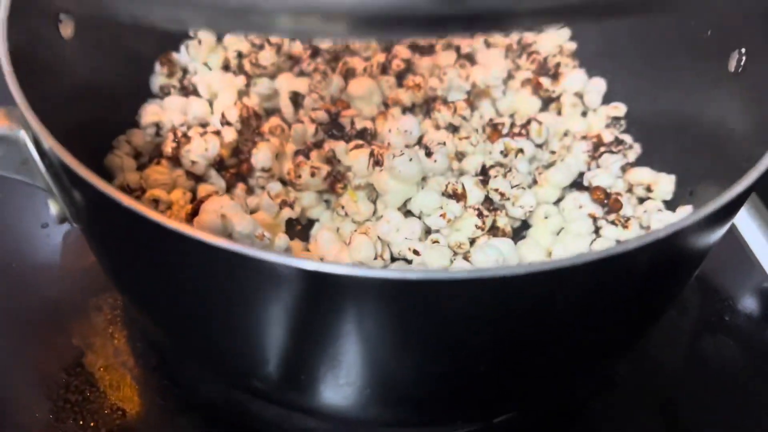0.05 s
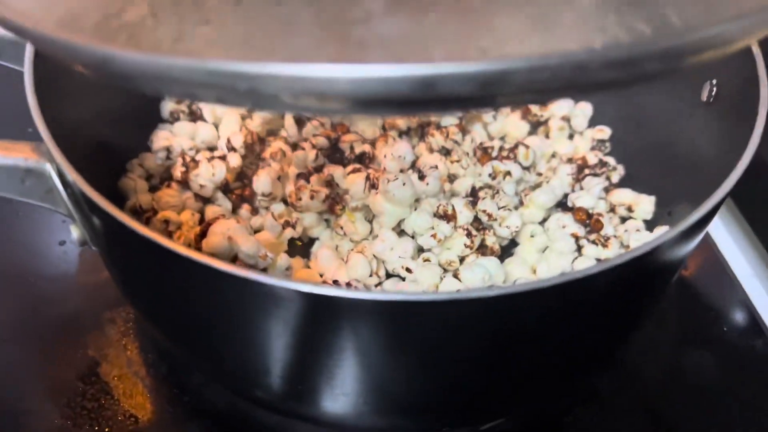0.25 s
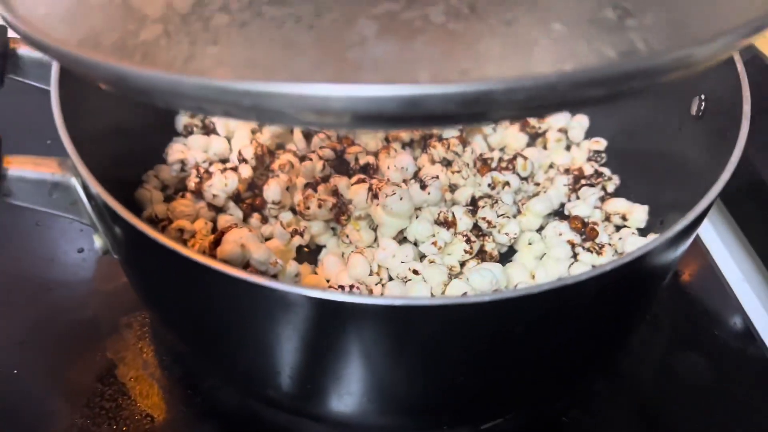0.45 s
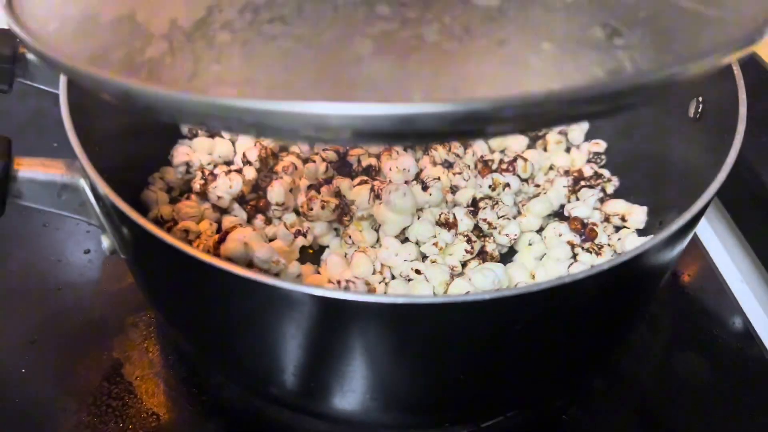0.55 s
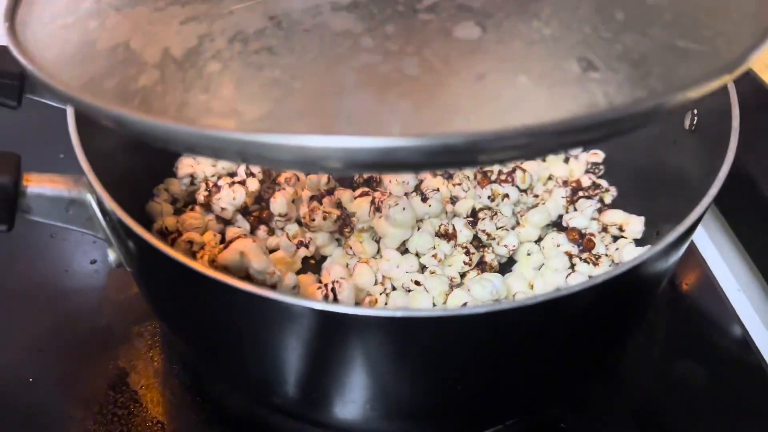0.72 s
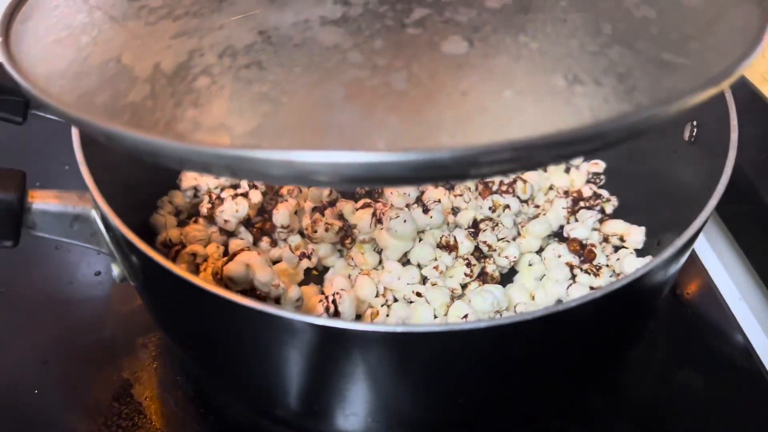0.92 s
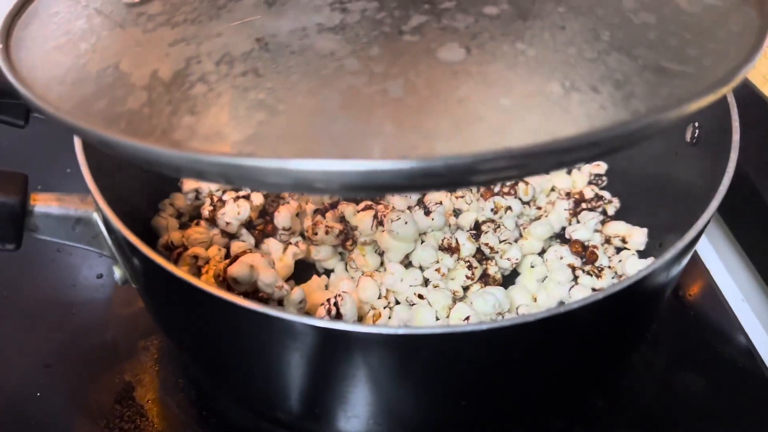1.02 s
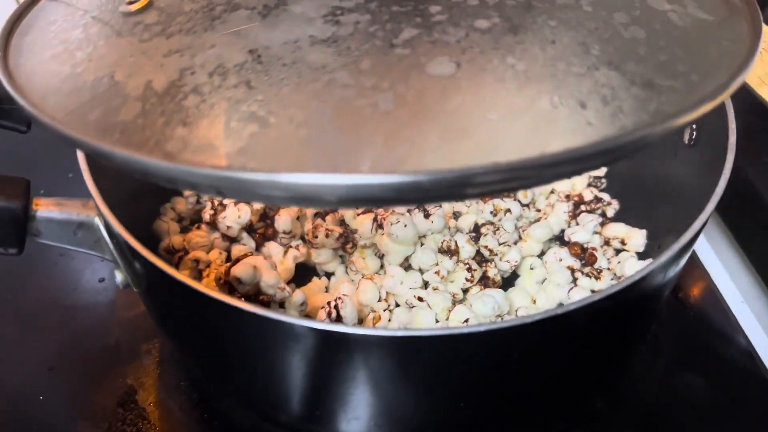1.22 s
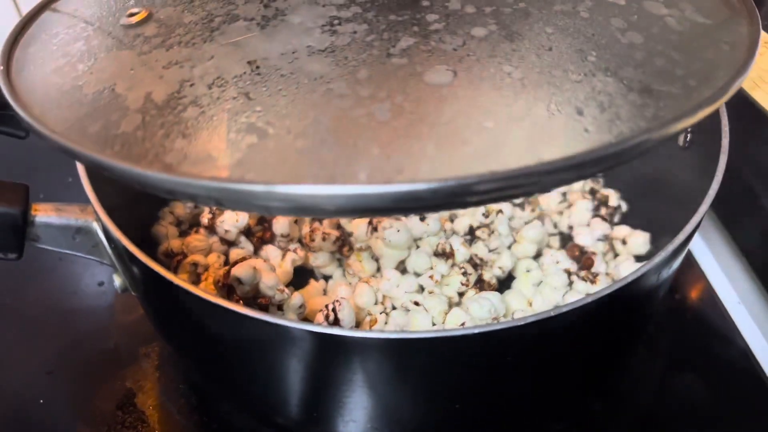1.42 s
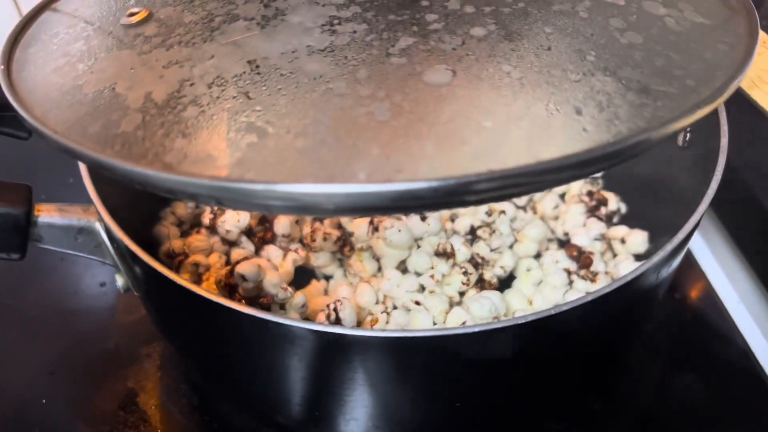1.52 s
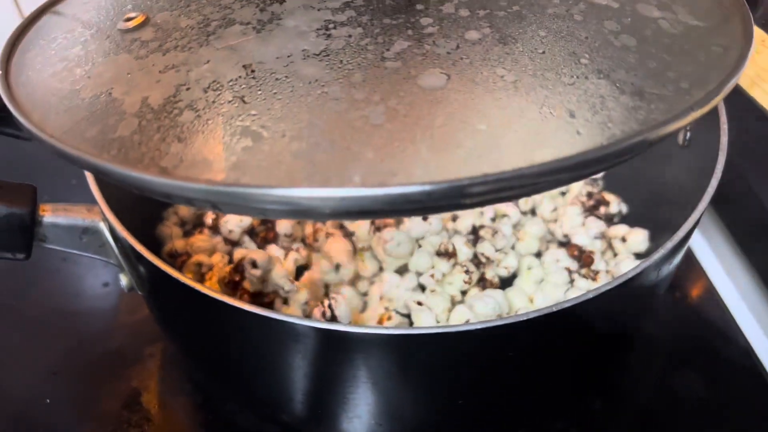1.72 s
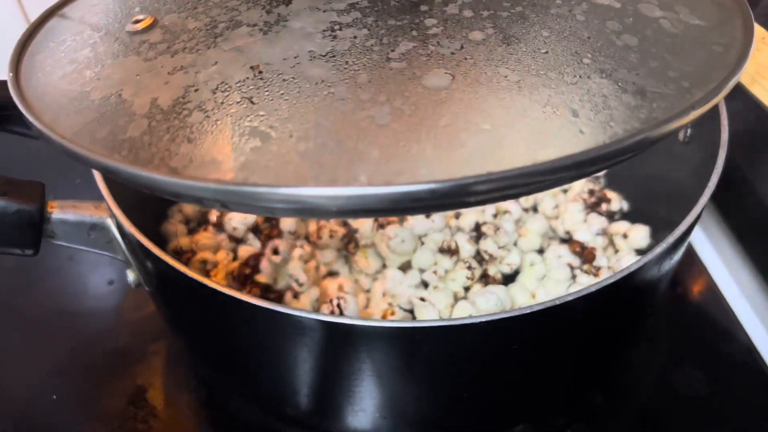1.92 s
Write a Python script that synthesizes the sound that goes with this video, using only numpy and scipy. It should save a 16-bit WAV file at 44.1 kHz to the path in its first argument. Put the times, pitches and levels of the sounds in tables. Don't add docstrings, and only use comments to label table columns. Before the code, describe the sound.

Popping corn kernels snap and knock against a steel pot and lid, with soft oil sizzle beneath.

```python
import sys
import numpy as np
from scipy import signal
from scipy.fft import rfft, irfft, next_fast_len
from scipy.io import wavfile
from scipy.ndimage import uniform_filter1d

SR = 44100
rng = np.random.default_rng(int(sys.argv[2]) if len(sys.argv) > 2 else 0)


def pcm_store(signal):
    levels = np.round(np.clip(np.atleast_2d(signal), -1, 1) * 32767)
    wavfile.write(sys.argv[1], SR, levels.astype(np.int16).T)


def nominal_scale(level):
    x = np.asarray(level, float) / 20
    return 10 ** x


N = 85995


def unit(x):
    return x / np.sqrt(np.mean(x ** 2) + 1e-20)


def along(points, hz):
    f, v = np.transpose(points)
    return np.interp(np.log(hz + 1), np.log(f + 1), v)


def filtered(x, response):
    n = x.shape[-1]
    m = next_fast_len(n + 8192)
    return irfft(rfft(x, m) * response(np.fft.rfftfreq(m, 1 / SR)), m)[..., :n]


def add(track, s, sound):
    part = track[:, round(s * SR):][:, :sound.shape[1]]
    part += sound[:, :part.shape[1]]


def rush(spectrum, patchy_db):
    # (frequency [Hz], likeness [-1 to 1])
    alike = [(60, 0.92), (130, 0.97), (220, 0.64), (400, -0.42), (1650, -0.014), (15000, 0.053)]
    z = signal.stft(rng.standard_normal((2, N + 512)), nperseg=512)[2]
    field = uniform_filter1d(rng.standard_normal(z.shape[1:]), size=6, axis=0)
    field = uniform_filter1d(field, size=8, axis=1)
    pair = signal.istft(z * nominal_scale(patchy_db * unit(field)), nperseg=512)[1][:, :N]

    def spread(hz):
        turn = np.arccos(np.clip(along(alike, hz), -1, 1)) / 2
        return nominal_scale(along(spectrum, hz)) * [np.cos(turn), np.sin(turn)]

    mid, side = filtered(pair, spread)
    return np.array([mid + side, mid - side]) / np.sqrt(np.mean(mid ** 2))


def background():
    # (frequency [Hz], level [dB])
    hum_curve = [(15, -32), (25, -8), (54, -0.5), (206, -11), (224, -12), (452, -12.5), (565, -19),
                 (718, -14), (1500, -37), (1950, -62), (3300, -120)]
    # (frequency [Hz], level [dB])
    fizz_curve = [(600, -15.5), (1000, -0.5), (1500, -3), (2500, -6.5), (6200, -4), (8600, -7.5),
                  (9600, -9), (12000, -120)]
    # (frequency [Hz], level [dB])
    hiss_curve = [(8500, -36), (9400, -9), (9700, -26), (10800, -9), (11100, -4.5), (13100, -6),
                  (13400, -32), (14300, -25), (14600, -4.5), (15800, -6), (16200, -44)]
    spits_per_s, spit_db = 330, -22
    hum_db, fizz_db, hiss_db = -49, -52.5, -57.5
    draw = rng.random((3, N))
    spits = (draw[0] < spits_per_s / SR) * np.log(draw[1:] + 1e-9)
    spits = unit(filtered(spits, lambda hz: nominal_scale(along(fizz_curve, hz))))
    hum = nominal_scale(hum_db) * rush(hum_curve, patchy_db=2.5)
    fizz = nominal_scale(fizz_db) * (rush(fizz_curve, patchy_db=1.84) + nominal_scale(spit_db) * spits)
    hiss = nominal_scale(hiss_db) * rush(hiss_curve, patchy_db=0.0)
    return hum + fizz + hiss


def buzz():
    # (frequency [Hz], level [dB])
    overtones = [(452.2, -60), (651.4, -65), (699.8, -70), (748.3, -62.5), (802.1, -61), (850.6, -65),
                 (952.8, -64)]
    t = np.arange(N) / SR
    total = np.zeros((2, N))
    for hz, db in overtones:
        wander = np.cumsum(rng.standard_normal(N)) * np.sqrt(1.5 / (2 * np.pi * SR))
        cycles = hz * t + rng.random((2, 1)) + wander
        total += nominal_scale(db) * np.sin(2 * np.pi * cycles)
    return total


def kitchen(x):
    # (frequency [Hz], time to fall 60 dB [s])
    echo_times = [(200, 0.1), (1000, 0.58), (4000, 0.47), (8000, 0.44), (16000, 0.043)]
    gap_s = 0.005
    out, step = np.zeros((2, N)), SR // 10
    for start in range(0, N, step):
        hz, t, z = signal.stft(rng.standard_normal((2, SR // 2)), SR, nperseg=256)
        fade = nominal_scale(-60 * t / along(echo_times, hz)[:, None])
        tail = signal.istft(z * fade, SR, nperseg=256)[1]
        tail = tail / np.linalg.norm(tail[0])
        add(out, start / SR + gap_s, signal.fftconvolve(x[None, start:start + step], tail, axes=1))
    return out


def steam():
    # (end time [s], swell time [s], level [dB])
    leak = (.2245, 0.022, -29)
    end_s, swell_s, db = leak
    ahead = end_s - np.arange(N) / SR
    jet = rush([(2500, -14), (4000, 3), (6300, -6), (7500, -6), (9000, -55)], patchy_db=7.5)
    return nominal_scale(db - 25 * np.abs(ahead) / swell_s) * (ahead > 0) * jet


def ring(modes, t, attack_s, scatter_db, blur=2 * np.pi):
    wander_hz = 9.3
    draw = rng.standard_normal((len(modes), 2))
    steps = rng.standard_normal((len(modes), len(t)))
    drifts = np.cumsum(steps, axis=1) * np.sqrt(wander_hz * blur / SR)
    total = np.zeros(len(t))
    for (hz, db, t60), (louder, sharper), drift in zip(modes, draw, drifts):
        tone = np.sin(2 * np.pi * hz * (1 + 0.0089 * sharper) * t + drift)
        total += nominal_scale(db + scatter_db * louder - 60 * t / t60) * tone
    return total * (1 - np.exp(-t / attack_s))


def burst(t, spectrum, rattle_db):
    rise_s, snap_t60 = 0.00155, 0.002
    rattle_s, rattle_t60, spiky_db = 0.0023, 0.011, 4
    shared = 0.28
    noise = rng.standard_normal((4, len(t)))
    spikes = nominal_scale(spiky_db * unit(uniform_filter1d(noise[3], size=24)))
    spikes = spikes / np.sqrt(np.mean(spikes[:round(0.006 * SR)] ** 2))
    after = np.maximum(t - rise_s, 0)
    rattle = spikes * nominal_scale(rattle_db - 60 * np.maximum(after - rattle_s, 0) / rattle_t60)
    shape = np.minimum(t / rise_s, 1) ** 2 * (nominal_scale(-60 * after / snap_t60) + rattle)
    z = rfft(shape * (np.sqrt(shared) * noise[0] + np.sqrt(1 - shared) * noise[1:3]))
    even = z / np.sqrt(uniform_filter1d(np.abs(z) ** 2, size=100, axis=1) + 1e-12)
    colour = nominal_scale(along(spectrum, np.fft.rfftfreq(len(t), 1 / SR)))
    pair = irfft(even * colour, len(t)) * (t < t[-1] / 2)
    return unit(pair) * np.sqrt(np.mean(shape ** 2))


def thuds():
    # (time [s], hollow level [dB], wall level [dB], knock level [dB])
    blows = [(.224, -35, -33, -18), (0.236, -28.5, -26, -15), (.264, -32.5, -28, -21),
             (0.298, -38, -27, -40), (0.3086, -23, -20.5, -22), (0.3114, -28, -24, -16),
             (0.36, -36.5, -28.5, -41), (0.5064, -15.5, -40.5, -38), (0.518, -24.5, -56, -34.5),
             (0.5276, -19, -23.5, -13.5), (0.556, -29, -40, -45), (0.578, -38, -36, -33),
             (0.9196, -27.5, -41, -41), (.93, -55, -35.5, -29), (1.383, -22, -35, -23),
             (1.395, -40, -41, -22), (1.592, -22, -22, -10), (1.601, -27.5, -21.5, -18),
             (1.611, -53, -25, -18), (1.6686, -28, -34, -26), (1.671, -21.5, -27.5, -21.5)]
    # (time [s], pitch [Hz], level [dB])
    rocks = [
        (0.238, 98, -31),
        (0.343, 79.2, -41),
        (.53, 70.4, -25),
        (0.599, 92.4, -38.5),
        (1.386, 134, -34),
        (1.595, 120, -31.5),
    ]
    # (frequency [Hz], level [dB], time to fall 60 dB [s])
    hollow_modes = [(154.5, 0, 0.04), (258.8, 3, 0.043), (295.8, -5.5, 0.074), (427.3, 1, 0.048),
                    (465.4, 2, 0.09)]
    # (frequency [Hz], level [dB], time to fall 60 dB [s])
    wall_modes = [(1099.3, -9, 0.28), (1148.6, -1, 0.057), (1477, -6.5, 0.14), (1979, -6.5, 0.084)]
    # (frequency [Hz], level [dB], time to fall 60 dB [s])
    rim_modes = [(1364, -8.5, 0.018), (1540, 3, 0.034), (1684, -1, 0.017), (1950, -30, 0.0052)]
    # (frequency [Hz], level [dB])
    puff_curve = [(120, -27), (250, -28.5), (460, 0), (560, -19), (900, -25.5), (2000, -70)]
    # (frequency [Hz], level [dB])
    scrape_curve = [(600, -64), (900, -17), (1150, -16), (1600, 3), (2100, -1.5), (3200, -23)]
    hollow_db, rim_db, scrape_db = -3, -3.5, -3.5
    rock_t60, pan_db = 0.14, 2.5
    out, puffs, t = np.zeros((2, N)), np.zeros((2, N)), np.arange(SR // 4) / SR
    for s, db, wall_db, knock_db in blows:
        air = nominal_scale(db + hollow_db) * ring(hollow_modes, t, 0.0047, 1.1, blur=2)
        metal = []
        for port in "LR":
            wall = nominal_scale(wall_db) * ring(wall_modes, t, 0.0018, 0.38)
            rim = nominal_scale(knock_db + rim_db) * ring(rim_modes, t, 0.0021, 6.4)
            metal.append(wall + rim)
        add(out, s, air + np.array(metal))
        puff = nominal_scale(db) * burst(t, puff_curve, rattle_db=0)[[0, 0]]
        scrape = nominal_scale(knock_db + scrape_db) * burst(t, scrape_curve, rattle_db=0)
        add(puffs, s, puff + scrape)
    for s, hz, db in rocks:
        add(out, s, np.tile(ring([(hz, db, rock_t60)], t, 0.0033, 0, blur=0), (2, 1)))
    soft_puffs = filtered(puffs, lambda hz: 1 / (1 + 1j * hz / 2200) ** 2)
    return out * nominal_scale([[pan_db], [-pan_db]]), soft_puffs


def pings():
    # (time [s], pitch [Hz], level [dB], time to fall 60 dB [s])
    shards = [(.2218, 6900, -19, 0.016), (.2248, 3140, -6, 0.0069), (.2252, 6540, -5.5, 0.0071),
              (0.2263, 4300, -14, .007), (.2373, 3040, -6, 0.0075), (.2376, 4500, -26, 0.0045),
              (0.2392, 3000, -13, .008), (0.2622, 2700, -17, 0.007), (.2995, 3300, -22, 0.0072),
              (0.299, 6100, -10, 0.0063), (0.3103, 383, -23.5, 0.026), (0.3199, 6050, -21, 0.0088),
              (.5078, 614, -30, .012), (.5082, 2750, -24.5, 0.019), (0.52, 2780, -26, .012),
              (0.5273, 5660, -29, 0.0073), (.5285, 4400, -35, 0.0084), (.5335, 5940, -35, .012),
              (0.5824, 4300, -35, 0.0066), (1.3828, 3770, -17, 0.024), (1.3837, 1595, -16, .016),
              (1.3866, 3080, -16, .006), (1.3838, 6040, -18, 0.021), (1.3912, 1670, -20, .012),
              (1.3983, 6000, -27, 0.013), (1.5911, 3730, -3.5, 0.011), (1.593, 1640, -10.5, .012),
              (1.594, 806, -26, 0.014), (1.601, 3890, -7, 0.0069), (1.6033, 1750, -19, 0.0072),
              (1.6174, 1554, -23, 0.022), (1.672, 1690, -19.5, 0.012), (1.6852, 8000, -21, 0.011)]
    rise_s, split = 0.00045, 0.038
    out, t = np.zeros((2, N)), np.arange(SR // 20) / SR
    for s, hz, db, t60 in shards:
        pair = np.sin(2 * np.pi * hz * np.array([[1], [1 + split]]) * t)
        mixed = pair * nominal_scale(5) + 0.82 * pair[::-1]
        add(out, s, nominal_scale(db - 60 * t / t60) * (1 - np.exp(-t / rise_s)) ** 2 * mixed)
    return out


def cracks():
    # (time [s], body level [dB], brightness [dB])
    pops = [(0.2237, -2.5, -14.5), (0.2363, -11.5, -11), (0.2635, -14.5, -28), (0.2991, -13, -9),
            (0.3096, -13, -3), (0.3181, -17.5, -7), (0.36, -21.5, -2.5), (0.374, -27, -10),
            (0.526, -24, -0.5), (0.533, -26, -10), (0.5402, -33, -17), (0.5542, -26.5, -10),
            (0.5795, -30.5, -7.5), (0.6965, -37.5, 1.5), (0.9195, -38, 10.5), (0.925, -25.5, 1),
            (0.9294, -25.5, -9), (0.9352, -29.5, -26), (1.238, -59, 17.5), (1.3826, -11, -6.5),
            (1.3954, -14.5, -5.5), (1.479, -43, 5), (1.5909, -6.5, -13), (1.6002, -5.5, -10),
            (1.635, -33, 8.5), (1.6699, -12.5, -12), (1.6849, -19, -4), (1.9404, -31.5, 1)]
    # (frequency [Hz], level [dB])
    hull_curve = [(1200, -18.5), (2200, -4), (2900, 0), (3900, -3), (5000, -5.5), (6200, -1), (7300, -14),
                  (9000, -40), (11700, -62)]
    # (frequency [Hz], level [dB])
    bright_curve = [(4120, -30), (7000, 1), (7960, -0.5), (10200, -7.5), (12500, 2), (13700, -13),
                    (15600, -1.5), (16100, -34), (16800, -42)]
    # (frequency [Hz], level [dB], time to fall 60 dB [s])
    lid_modes = [(2675, -0.5, 0.11), (3296, -9, 0.1), (4040, -4.5, 0.12), (4390, -11, 0.57),
                 (5330, -11.5, 0.51), (6127, 1.5, 0.023)]
    body_db, edge_db, lid_db = -2, -5.5, -20.5
    out, lid, t = np.zeros((2, N)), np.zeros((2, N)), np.arange(SR // 5) / SR
    for s, db, bright_db in pops:
        body = nominal_scale(db + body_db) * burst(t, hull_curve, rattle_db=-8)
        edge = nominal_scale(db + edge_db + bright_db) * burst(t, bright_curve, rattle_db=0)
        add(out, s, body + edge)
        ringing = np.array([ring(lid_modes, t, 0.00058, 1.64) for port in "LR"])
        add(lid, s, nominal_scale(db + lid_db) * ringing)
    return out, lid


def scene():
    lag_s, puff_db = 0.0002113, -8.5
    room_db, room_low_db = -8.5, -10
    ping_room_db = -5
    low, puffs = thuds()
    shards = pings()
    high, lid = cracks()
    noisy = high + steam()
    ports = np.array([[1], [-1]])
    treble = filtered(noisy + shards, lambda hz: np.exp(1j * np.pi * hz * lag_s * ports))
    pot = treble + lid + low + nominal_scale(puff_db) * puffs
    sent = noisy[0] + nominal_scale(ping_room_db) * shards[0]
    room = kitchen(nominal_scale(room_db) * sent + nominal_scale(room_low_db) * puffs[0])
    return pot + room + background() + buzz()


def top_cut(x):
    return signal.sosfilt(signal.butter(12, 16970, fs=SR, output="sos"), x)


def record(dry):
    # (centre [Hz], width [Hz], depth [0-1])
    dips = [(10170, 720, 0.58), (13900, 200, 0.8)]
    top_hz, rumble_hz = 16950, 36

    def port(hz):
        return np.prod([1 - np.clip(d, 0, 1) * np.exp(-((hz - c) / w) ** 2) for c, w, d in dips], axis=0)

    heard = filtered(dry, port)
    held = heard / (1 + np.abs(heard / 0.85) ** 6) ** (1 / 6)
    limited = filtered(held, lambda hz: (hz < top_hz) * hz ** 4 / (hz ** 4 + rumble_hz ** 4))
    return top_cut(limited)


dry = scene()
out = record(dry)
pcm_store(out)
```